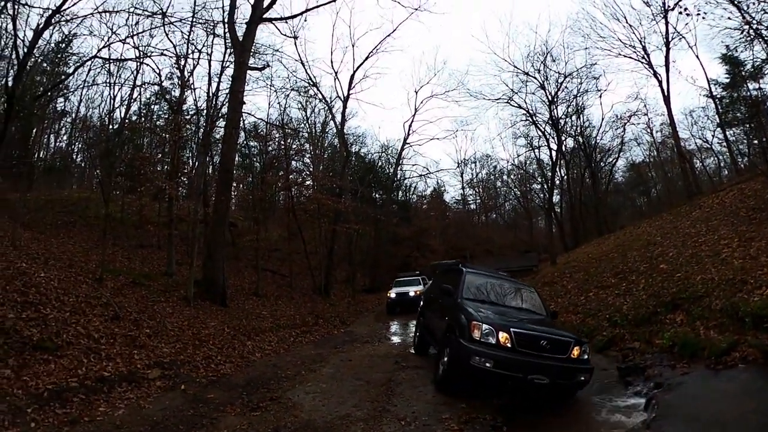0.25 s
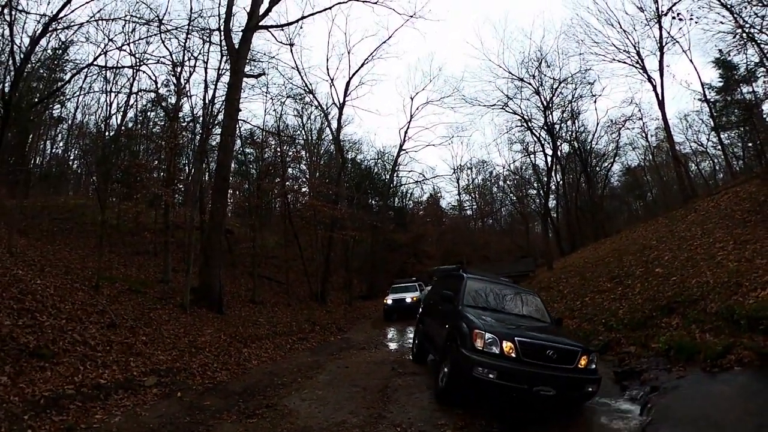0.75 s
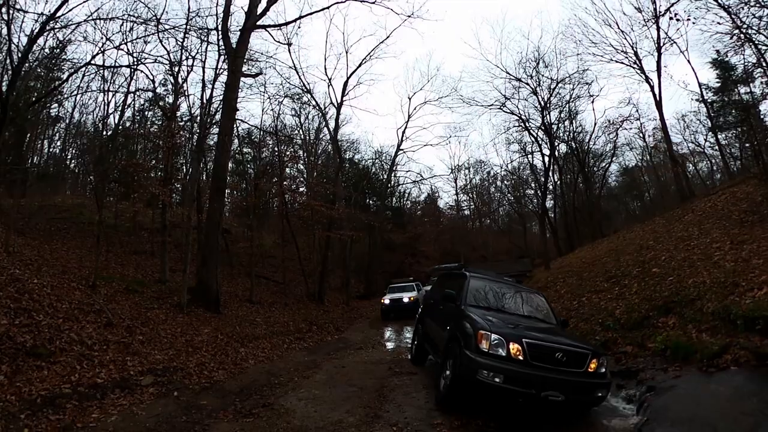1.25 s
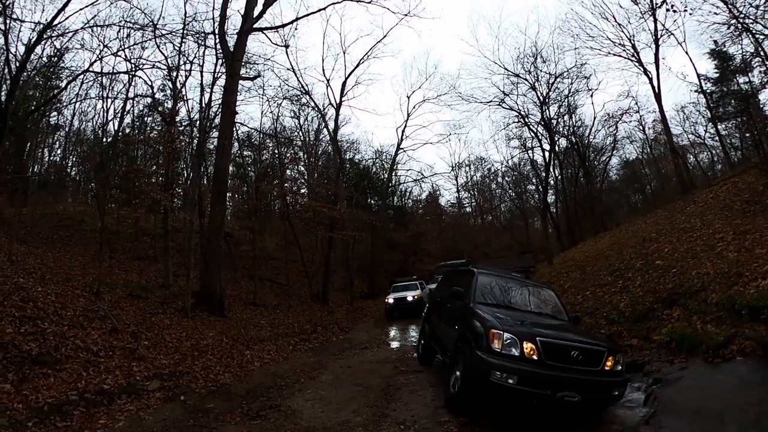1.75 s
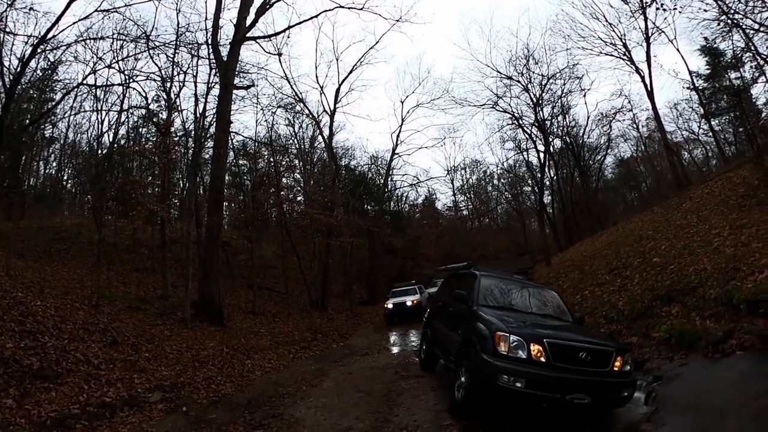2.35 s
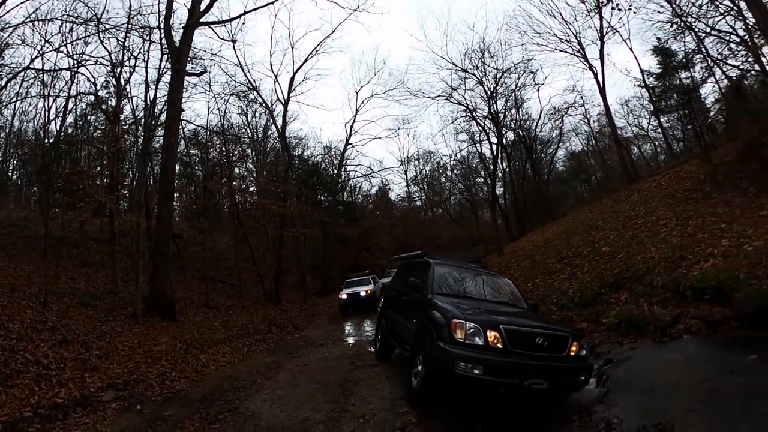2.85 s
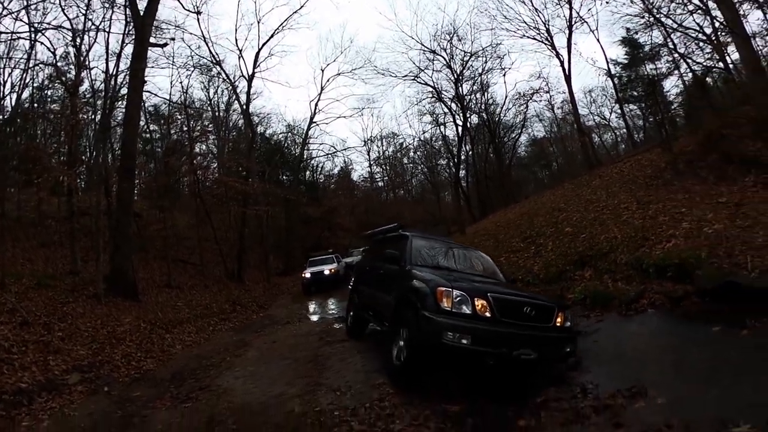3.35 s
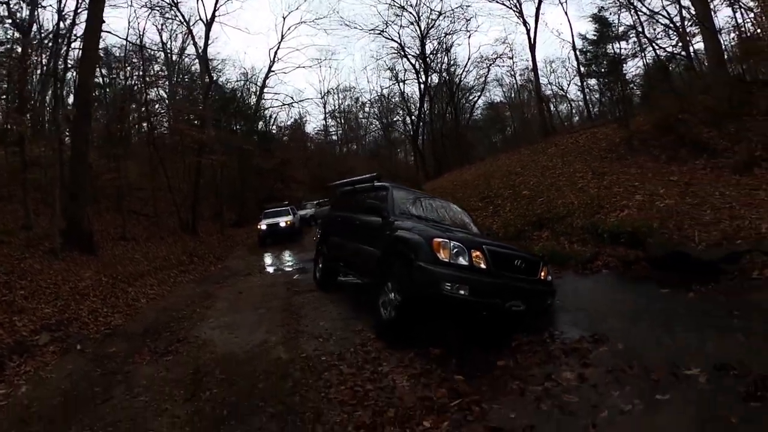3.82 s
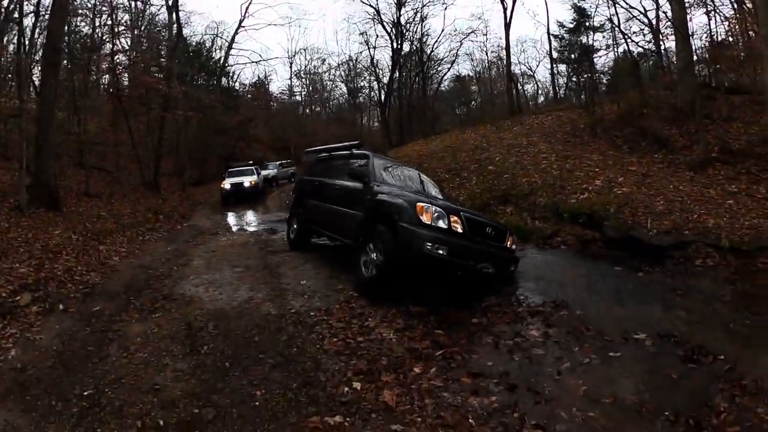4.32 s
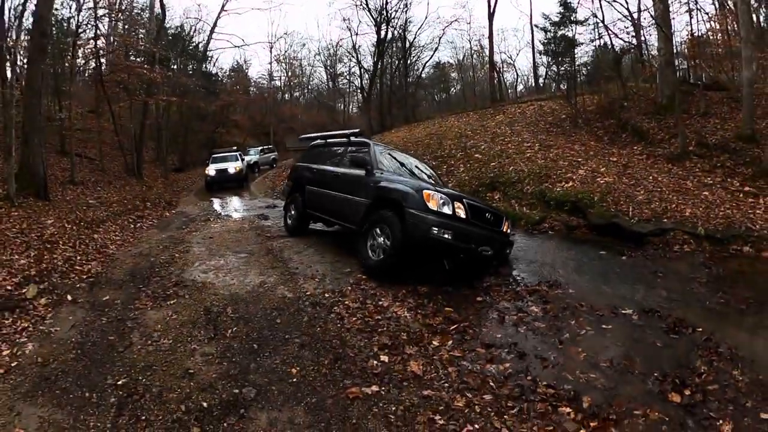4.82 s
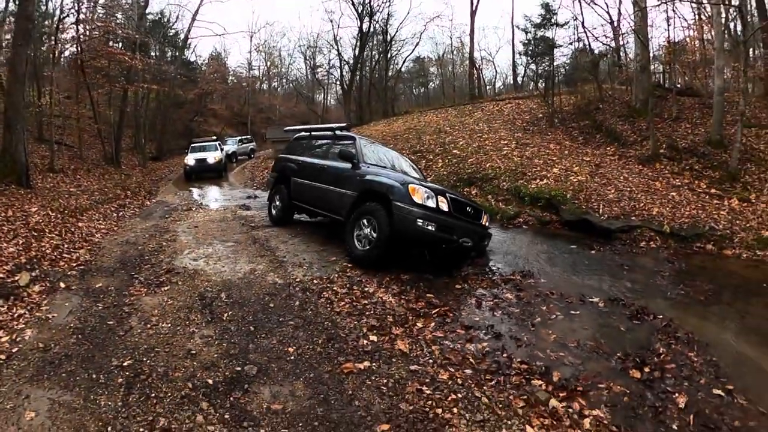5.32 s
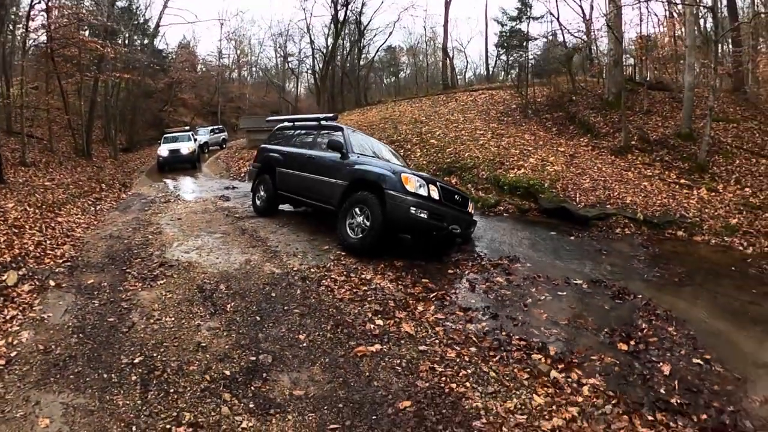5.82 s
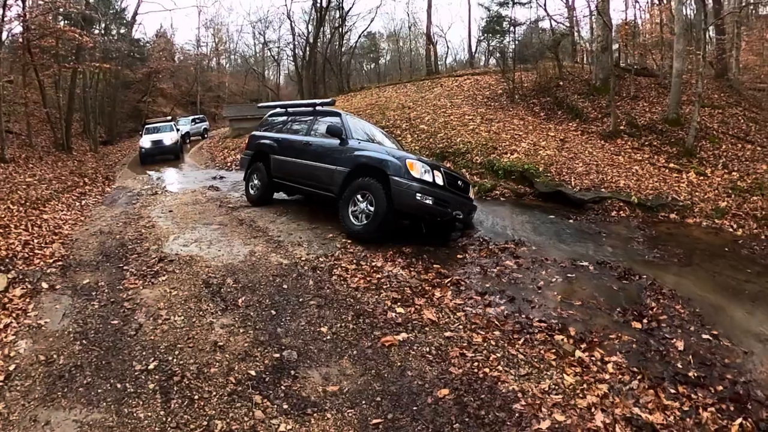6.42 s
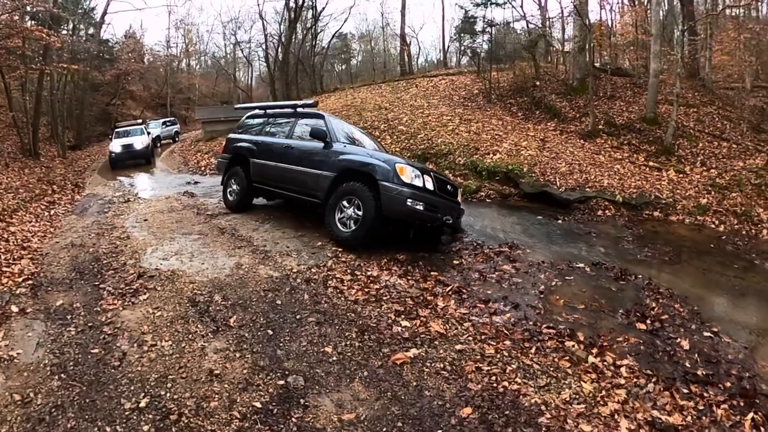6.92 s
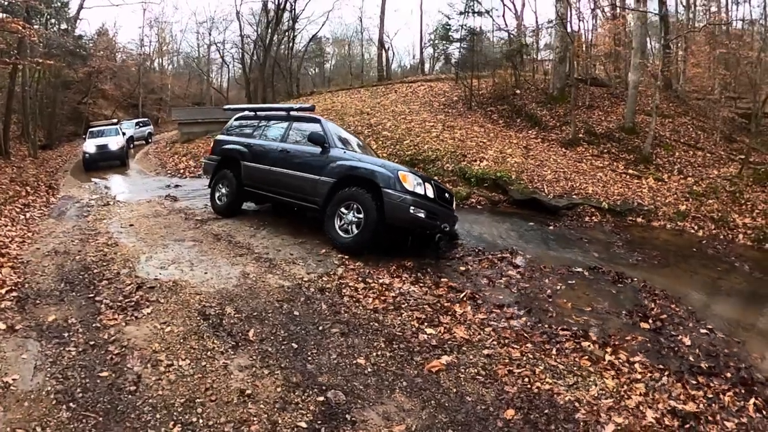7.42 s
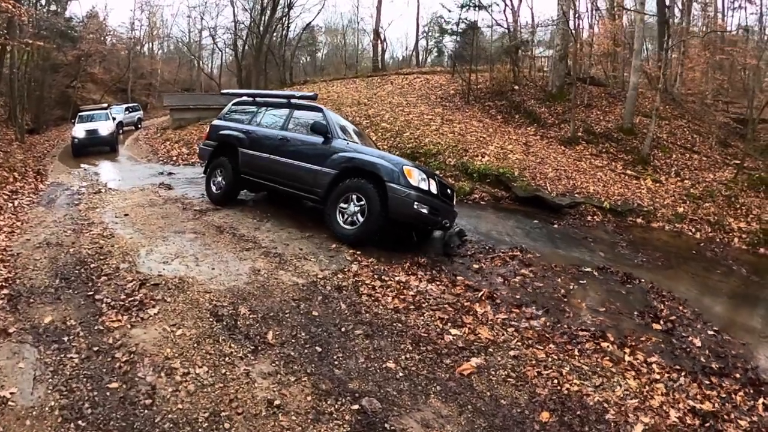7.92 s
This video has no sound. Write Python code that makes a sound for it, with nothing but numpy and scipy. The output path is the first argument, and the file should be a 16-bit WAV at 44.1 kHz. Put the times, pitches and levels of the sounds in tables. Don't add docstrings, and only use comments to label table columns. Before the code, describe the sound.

Outdoors at a forest creek, heard from the bank: tyres push steadily through water with gurgles and fine spray while stones knock. A deep eight-cylinder exhaust rises, a hard crack and gravel crunch follow, and the wash stops. The engine then revs long and loud with a rushing fan, drops to a low hum, and revs again over skidding gravel. Another engine idles faintly behind.

```python
import sys
import numpy as np
from scipy import signal
from scipy.fft import rfft, irfft, next_fast_len
from scipy.io import wavfile
from scipy.ndimage import uniform_filter1d

SR = 44100
rng = np.random.default_rng(int(sys.argv[2]) if len(sys.argv) > 2 else 0)


def rack_gain(trim_db):
    fader = np.asarray(trim_db, float)
    return 10 ** (fader / 20)


def waveform_to_disk(signal):
    frames = np.transpose(np.atleast_2d(signal))
    scaled = np.clip(frames, -1, 1) * 32767
    samples = np.round(scaled).astype(np.int16)
    wavfile.write(sys.argv[1], SR, samples)


N = 360297


def rms_one(x):
    return x / np.sqrt(np.mean(x ** 2) + 1e-20)


def in_time(rows):
    s, *columns = np.transpose(rows)
    return [np.interp(np.arange(N) / SR, s, c) for c in columns]


def sounding(rows, fade_s):
    start, end = rows[0][0], rows[-1][0]
    gate = np.interp(np.arange(N) / SR, [start - fade_s, start, end, end + fade_s], [0, 1, 1, 0])
    return gate * rack_gain(np.array(in_time(rows)))


def swells(rows):
    out = np.zeros((2, N + SR))
    for s, swell_s, fade_s, *levels_db in rows:
        t = np.arange(-int(3 * swell_s * SR), int(3 * fade_s * SR)) / SR
        i = int((s + t[0]) * SR)
        shape_db = 20 * np.where(t < 0, t / swell_s, -t / fade_s)
        out[:, i:i + len(t)] += rack_gain(np.array(levels_db)[:, None] + shape_db)
    return out[:, :N]


def drift(rate):
    r = np.exp(-80 * np.pi * rate / SR)
    slow = signal.lfilter([1], [1, -2 * r, r * r], rng.standard_normal(N // 40 + 2002))[2000:]
    return np.interp(np.arange(N) / 40, np.arange(len(slow)), rms_one(slow))


def grains(per_s, spread_db):
    out = np.zeros(N)
    hit = np.flatnonzero(rng.random(N) < per_s / SR)
    size, sign = rng.random((2, N))[:, hit]
    out[hit] = rack_gain(spread_db * np.minimum(-np.log(size + 1e-9), 3)) * np.sign(sign - 0.5)
    return rms_one(out)


def resonate(x, hz, width_hz):
    r = np.exp(-np.pi * width_hz / SR)
    poles = [1, -2 * r * np.cos(2 * np.pi * hz / SR), r * r]
    return signal.lfilter(np.array([1, 0, -1]) * (1 - r * r) / 2, poles, x)


def twice(x, hz, width_hz):
    return resonate(resonate(x, hz, width_hz), hz, width_hz)


def rung(hz, t60, rise=0.):
    t = np.arange(int(np.clip(t60, 0.002, 0.2) * SR)) / SR
    onset = np.sin(np.pi / 2 * np.minimum(t * hz / 1.22, 1)) ** 2
    return onset * rack_gain(-60 * t / t60) * np.sin(2 * np.pi * hz * t * (1 + rise * t / t60))


def add(out, s, sound):
    i = int(s * SR)
    out[i:i + len(sound)] += sound[:N - i]


def band_pass(x, order, low_hz, high_hz):
    return signal.sosfilt(signal.butter(order, [low_hz, high_hz], "band", fs=SR, output="sos"), x)


def coloured(source, colour):
    hz, level_db = np.transpose(colour)
    size = next_fast_len(N)
    octaves = np.log2(np.maximum(np.arange(size // 2 + 1) * SR / size, 1))
    outside = np.maximum(np.log2(hz[0]) - octaves, 0) + np.maximum(octaves - np.log2(hz[-1]), 0)
    gain_db = np.interp(octaves, np.log2(hz), level_db) - 60 * outside
    return rms_one(irfft(rfft(source, size) * rack_gain(gain_db), size)[:N])


def split(x, edges_hz):
    size = next_fast_len(N)
    hz = np.arange(size // 2 + 1) * SR / size
    below = [0] + [1 / (1 + (hz / edge) ** 16) for edge in edges_hz] + [1]
    return [rms_one(irfft(rfft(x, size) * (b - a), size)[:N]) for a, b in zip(below, below[1:])]


def turbulence(patchy_db, shared):
    out, together, white = 0, drift(26), rng.standard_normal((2, N))
    edges = 28 * 2 ** (np.arange(20) / 2)
    for k, (low, high) in enumerate(zip(edges, edges[1:])):
        flicker_db = patchy_db * (shared * together + 0.93 * drift(13.0))
        out = out + rack_gain(flicker_db) * band_pass(white[k % 2], 2, low, high)
    return rms_one(out)


def bubbles(low_hz, high_hz, per_s, sharpness, count):
    pitches = np.geomspace(low_hz, high_hz, count)
    born, dealt = grains(per_s, spread_db=4.0), rng.integers(0, count, N)
    rings = (twice(born * (dealt == k) + 1e-18, hz, hz / sharpness) for k, hz in enumerate(pitches))
    return rms_one(sum(rings))


# time in seconds, four-stroke cycle rate in Hz.
CYCLE_SPEED = [(2.68, 5.5), (2.88, 7.75), (3.03, 8.7), (3.44, 8.8), (3.83, 7.4), (4.09, 14.0), (4.27, 15.2),
               (4.6, 12.3), (4.81, 16.0), (5.7, 17.4), (6.11, 17.4), (6.3, 12.7), (6.55, 9.2), (6.97, 6.5),
               (7.22, 7.1), (7.42, 12.7), (7.76, 13.7), (8.17, 10.3)]


def speed():
    flywheel_s = 0.1
    return uniform_filter1d(in_time(CYCLE_SPEED)[0], size=int(flywheel_s * SR))


# time in seconds, level in dB.
THROTTLE_LOAD = [(2.62, -37), (2.76, -21.5), (2.92, -18), (3.74, -25.5), (3.92, -19.5), (4.25, -21),
                 (4.52, -24), (4.85, -19), (5.44, -19.5), (5.56, -24), (6.02, -30), (6.16, -20.5),
                 (6.4, -32), (6.9, -40), (7.19, -31), (7.3, -22.5), (7.65, -25), (8.17, -25.5)]
# order, level in dB at mean load, share of the load's swing.
STRONG_ORDERS = [(3, -29, 0.1), (5, -26, 0.16), (8, -24, 0.82), (16, -30.5, 1.24)]
# order, level in dB against the firing order.
WEAK_ORDERS = [(4, -21), (6, -18), (10, -21), (13, -22.5)]
# frequency in Hz, gain in dB.
PIPE_RESPONSE = [(22, -21), (40, -14), (52, -4), (68, 0.5), (95, -6.5), (132, -2.5), (165, -6.5),
                 (280, -24.5)]


def exhaust():
    mean_load_db, uneven_db, rough_db, idle_db = -24, 1.5, 3.5, -1.5
    silencer_db, tailpipe_db = -6, 4.5
    cycle_hz, (load_db,) = speed(), in_time(THROTTLE_LOAD)
    pipe_hz, pipe_db = np.transpose(PIPE_RESPONSE)
    phase = 2 * np.pi * np.cumsum(cycle_hz * (1 + 0.004 * drift(12))) / SR
    levels = {}
    for k, db, share in STRONG_ORDERS:
        through_pipe_db = np.interp(np.log(k * cycle_hz), np.log(pipe_hz), pipe_db)
        levels[k] = db + share * (load_db - mean_load_db) + through_pipe_db
    double_db = [0, silencer_db, silencer_db, tailpipe_db]
    levels[16] = levels[16] + np.interp(16 * cycle_hz, [122, 142, 205, 235], double_db)
    for k, db in WEAK_ORDERS:
        levels[k] = levels[8] + db
    out = np.zeros(N)
    for k, db in levels.items():
        wander_db = uneven_db * drift(5.7)
        if k not in (3, 5, 8):
            wander_db = wander_db + rough_db * drift(9.5)
        out += np.sqrt(2) * rack_gain(db + wander_db) * np.sin(k * phase + k * k)
    idle_gain = rack_gain(np.interp(np.arange(N) / SR, [2.55, 2.72], [idle_db, 0]))
    return idle_gain * out, phase


# time in seconds, level in dB.
BAY_FACING = [(3.62, -3), (3.8, -3.5), (3.97, 0.5), (4.3, 0), (4.55, 0.75), (4.72, 1), (4.95, 0.9),
              (5.3, 2), (6.0, 2.5), (6.4, 0), (7.3, -2), (8.17, -1.5)]
# level in dB at full speed, dB per doubling of speed, share of the facing.
BAY_LAYERS = [(-34, 0.5, 2.55), (-43, 8, 0.64), (-62.5, 10, 0.46), (-75, 19, 1.6)]
# frequency in Hz, level in dB per Hz.
ROAR_COLOUR = [(30, 6.5), (120, 8.5), (220, 1.5), (320, -8), (470, 1), (535, -4), (600, -4), (690, -8.5),
               (870, -7.5), (980, -10.5), (1050, -26.5)]
# frequency in Hz, level in dB per Hz.
FAN_COLOUR = [(1050, 3), (1460, 1), (2150, -3), (2630, -4), (2950, -5.5), (3050, -6.5), (4140, -12),
              (5000, -16.5), (6140, -16.5), (9270, -24.5), (10800, -38.5), (12300, -42), (13200, -42.5),
              (15500, -54)]
# frequency in Hz, width in Hz, level in dB against the roar.
INTAKE_PIPE = [(355.5, 3.8, -23), (537, 82, -13), (2550, 410, -26.5), (1500, 200, -30.5)]
# time in seconds, blade rate in Hz, level in dB.
COASTING_FAN = [
    (5.9, 141.4, -51),
    (6.15, 141.4, -32),
    (6.5, 129.7, -34.5),
    (6.9, 119.5, -42),
    (7.15, 115.2, -35),
]


def engine_bay(rush, phase):
    full_speed_hz = 17
    pedal_lead_s = 0.075
    ahead = np.arange(N) + pedal_lead_s * SR
    revs = np.interp(ahead, np.arange(N), speed()) / full_speed_hz
    (facing,) = sounding(BAY_FACING, fade_s=0.077)
    gains = [rack_gain(db + per_octave_db * np.log2(revs)) * facing ** share
             for db, per_octave_db, share in BAY_LAYERS]
    rush = rush * (1 + 0.035 * np.sin(8 * phase))
    drips = bubbles(1009, 7720, 600, sharpness=24.0, count=9)
    fan = coloured(rush + 0.15 * drips, FAN_COLOUR)
    pipe = sum(rack_gain(db) * rms_one(twice(rush, hz, width_hz)) for hz, width_hz, db in INTAKE_PIPE)
    roar = coloured(rush, ROAR_COLOUR) + pipe * revs ** 3.8
    layers = [roar] + split(fan, [6000, 10500])
    blade_hz, blade_db = in_time(COASTING_FAN)
    turn = 2 * np.pi * np.cumsum(blade_hz) / SR
    blades = rack_gain(blade_db + 1.7 * drift(2.4)) * (np.sin(turn) + rack_gain(-15) * np.sin(2 * turn))
    return np.sum(np.array(gains) * layers, axis=0) + blades


# time in seconds, churn in dB.
TYRE_CHURN = [(0.0, -1), (.55, 2.5), (.85, 2), (1.2, 3.5), (1.6, 2.5), (2.0, -0.3), (2.2, 2), (2.45, 1.6),
              (2.75, 3.5), (3.1, 3), (3.45, 2.5), (3.59, -3.5), (3.7, -19)]
# frequency in Hz, level in dB per Hz.
WASH_COLOUR = [(30, -23), (85, -7), (110, -6.5), (225, 1), (389, -8), (455, -16.5), (530, -15.5),
               (673, -10), (800, -11), (1000, -27)]
# frequency in Hz, level in dB per Hz.
SPRAY_COLOUR = [(1000, -1), (1630, 0.5), (2390, -1.5), (2950, -7), (3420, -7.5), (5060, -17), (5900, -16),
                (6000, -12.5), (7950, -13.5), (8050, -18.5), (8800, -22.5), (9200, -20), (11000, -33.5),
                (15400, -43)]


def wash(rush):
    wash_db, wash_follows, approach_db_per_s, spray_db = -36.5, 0.2, 0.2, -50
    gurgles = bubbles(159.8, 923, 250, sharpness=5.0, count=10)
    low = coloured(rush + 0.19 * gurgles, WASH_COLOUR)
    fizz = bubbles(983, 9000, 1500, sharpness=6.6, count=12)
    spray = coloured(rush + 0.29 * fizz, SPRAY_COLOUR)
    (churn,) = sounding(TYRE_CHURN, fade_s=0.2)
    low_gain = rack_gain(wash_db + approach_db_per_s * np.arange(N) / SR) * churn ** wash_follows
    waves = rack_gain(0.7 * drift(4))
    return rack_gain(0.97) * low_gain * low + rack_gain(spray_db) * churn * spray * waves


# time in seconds, peak in dB, ring in Hz, ring t60 in seconds.
STONE_KNOCKS = [(0.047, -28, 774, 0.02), (0.233, -34, 775, 0.028), (0.256, -32.5, 600, 0.031),
                (1.008, -28, 620, 0.024), (1.047, -30, 667, 0.07), (1.072, -19.5, 694, 0.027),
                (1.128, -15.5, 744, 0.011), (1.256, -30, 660, 0.03), (2.033, -39, 610, 0.057),
                (3.494, -25, 636, .02), (3.503, -24, 720, 0.034), (3.55, -20, 524, 0.027),
                (3.566, -32, 790, 0.016), (3.525, -32, 710, 0.016), (3.911, -28, 800, 0.013),
                (3.595, -18, 483, 0.035), (3.599, -31, 790, 0.024), (3.613, -18, 650, 0.022),
                (3.647, -28, 604, 0.023), (3.826, -27, 826, 0.019), (3.96, -36, 853, 0.014),
                (4.022, -30, 743, 0.016), (7.331, -38, 670, 0.048), (7.378, -34, 503, 0.023),
                (7.826, -25, 990, .015), (7.841, -23, 514, .03), (7.847, -22, 1010, 0.027),
                (7.883, -20, 990, 0.022), (7.907, -26, 596, 0.032), (3.459, -27, 570, 0.019),
                (4.297, -27, 510, 0.031), (4.524, -29.5, 560, 0.046), (4.703, -29, 530, 0.038),
                (4.945, -26, 510, 0.036), (5.471, -25, 528, 0.028), (5.847, -24, 550, 0.041),
                (6.493, -34, 870, 0.052), (6.514, -31, 860, 0.029), (7.049, -28, 890, 0.016),
                (7.072, -26, 885, 0.011)]
# time in seconds, peak in dB, ring in Hz, ring t60 in seconds.
STONE_CRACKS = [(.725, -32, 2220, 0.016), (.726, -28, 1290, 0.011), (3.2, -31, 1250, .012),
                (3.4174, -10, 1520, 0.014), (3.419, -36.5, 2800, 0.0086), (3.418, -13, 640, 0.012),
                (3.418, -6, 361, 0.013), (3.4192, -20, 910, 0.039), (3.474, -26, 1190, 0.035),
                (3.567, -31.5, 1390, 0.016), (3.596, -35, 1480, 0.028), (3.732, -41, 1310, 0.043),
                (3.765, -33, 1300, 0.016), (3.804, -42, 1600, 0.014), (4.041, -34, 1170, .015),
                (4.065, -39, 1500, 0.036), (7.024, -35, 1270, .015), (7.051, -33, 1500, .01),
                (7.07, -34, 1500, .01), (7.706, -30, 1510, 0.027), (7.761, -35, 1470, 0.017),
                (7.795, -29, 1600, .015), (7.86, -22, 1500, 0.023), (3.818, -31, 1520, 0.022),
                (3.874, -28, 1380, 0.018), (3.91, -11.5, 1300, 0.0079), (7.196, -22, 1100, 0.01),
                (7.195, -23, 2030, 0.005), (7.678, -24, 1465, 0.025)]
# time in seconds, peak in dB, ring in Hz, ring t60 in seconds.
WHEEL_THUMPS = [(0.083, -14.5, 150, 0.057), (0.09, -28, 622, 0.05), (0.1, -24, 337, 0.04),
                (.758, -24, 220, 0.048), (3.2, -28, 114, 0.33), (0.725, -27, 686, .01),
                (0.128, -29, 200, 0.055), (3.43, -12, 38, 0.15), (3.47, -12, 97, 0.19),
                (7.0, -30, 113.5, 0.26), (7.03, -23.5, 86, 0.32), (7.122, -29, 132, 0.18),
                (7.201, -25, 207, 0.093), (7.3, -27, 139, 0.18)]
# frequency in Hz, level in dB, t60 in seconds.
STONE_BED = [(150, -18, 0.03), (361, -8.5, 0.019), (910, -26.5, 0.14), (2330, -29, 0.0079)]


def knocks():
    out, hits = np.zeros(N), STONE_KNOCKS + STONE_CRACKS + WHEEL_THUMPS
    shakes_db = rng.normal(0, 1.9, (len(hits), len(STONE_BED)))
    for (s, peak_db, hz, t60), shake_db in zip(hits, shakes_db):
        add(out, s, rack_gain(peak_db + 4.0) * rung(hz, t60))
        if hz > 1000:
            add(out, s, rack_gain(peak_db - 5.5) * rung(hz * 0.63, 0.008))
            add(out, s, rack_gain(peak_db - 17) * rung(hz * 1.7, 0.008))
        for (bed_hz, bed_db, bed_t60), own_db in zip(STONE_BED, shake_db):
            add(out, s, rack_gain(peak_db + bed_db + own_db) * rung(bed_hz, bed_t60))
    return out


# frequency in Hz, width in Hz, dB under the wheel, dB skidding loose.
GRAVEL = [(114.3, 19, 26, -34), (200, 66, 18, -2.5), (528, 180, 7, 1.5), (640, 194, 10.5, -8),
          (1006, 290, -35, -1), (1520, 250, -9.5, -4.5)]
# peak time in seconds, swell in seconds, fade in seconds, low grind in dB, chips in dB.
CRUSH = [(3.478, 0.046, 0.032, -18.5, -48), (3.508, 0.043, .05, -18.5, -58), (3.56, 0.04, 0.055, -21, -57),
         (3.602, 0.025, 0.1, -24, -51), (3.62, 0.034, 0.039, -37, -42), (6.94, 0.04, 0.15, -32.5, -45),
         (7.054, 0.021, 0.11, -33, -43.5), (7.25, 0.032, 0.19, -38, -64.5), (7.4, 0.049, 0.031, -33, -40),
         (7.5, 0.035, .04, -45, -40.5)]
# peak time in seconds, swell in seconds, fade in seconds, low grind in dB, chips in dB.
SKID = [(3.814, 0.037, 0.14, -33.5, -38.5), (3.912, 0.01, 0.016, -22.5, -42), (3.99, 0.025, 0.12, -45, -48),
        (4.08, 0.25, 0.02, -37, -51), (4.78, 0.17, 0.35, -41.5, -42.5), (6.5, 0.085, 0.14, -40.5, -56),
        (7.678, 0.011, 0.14, -33, -38), (7.765, 0.025, 0.099, -43, -44), (7.8, .04, .06, -47, -44),
        (7.822, 0.032, 0.094, -43, -44), (7.853, 0.035, 0.1, -26.5, -35), (7.87, 0.056, 0.094, -35, -36),
        (7.885, 0.081, 0.014, -25, -38.5), (7.91, .02, 0.037, -53, -42)]


def grind():
    clicks = np.array([grains(800, spread_db=3.5), grains(2500, spread_db=2.5)])
    rings = np.array([(-1) ** k * twice(clicks, hz, 1.64 * width_hz)
                      for k, (hz, width_hz, *_) in enumerate(GRAVEL)])
    loaded, loose = np.sum(rack_gain(np.array(GRAVEL)[:, 2:, None]) * rings, axis=0)
    splinters = bubbles(1700, 8200, 2500, sharpness=2.0, count=7) + 2.0 * grains(4600, spread_db=-19.0)
    grit = rms_one(band_pass(splinters, 2, 5000, 12500))
    chips = band_pass(splinters, 2, 1500, 4500)
    chips = rms_one(signal.sosfilt(signal.butter(2, 8000, fs=SR, output="sos"), chips))
    crush_gain, crush_chips = swells(CRUSH)
    skid_gain, skid_chips = swells(SKID)
    low = rack_gain(-3.0) * crush_gain * rms_one(loaded) + rack_gain(-4.5) * skid_gain * rms_one(loose)
    thrown = crush_chips + skid_chips
    grit_gain = rack_gain(-17.5) * np.sqrt(thrown / rack_gain(-30))
    return low + rack_gain(-8.0) * thrown * (chips + grit_gain * grit)


# time in seconds, peak in dB, ring in Hz.
WATER_DROPS = [(0.3082, -31, 6540), (0.575, -23.5, 3670), (1.0081, -26, 6640), (2.187, -33, 7500),
               (2.2538, -28, 3900), (2.7072, -35, 3820), (3.61, -22.5, 4600), (3.808, -29, 5300),
               (3.8761, -31, 3570), (3.9105, -31, 3580), (3.995, -30, 5900), (4.315, -30, 6100),
               (4.522, -29, 3860), (4.5979, -32, 4100), (4.775, -28, 4000), (5.5222, -24, 3770),
               (5.5653, -28, 3350), (6.2696, -39, 3780), (7.1172, -35, 4210), (7.243, -36, 3800),
               (7.4944, -42, 4200), (7.6791, -39, 3480), (7.7597, -48, 3580), (7.7942, -42, 3570),
               (7.8545, -48, 3770)]


def drops():
    out, n = np.zeros(N), np.arange(400)
    tick = np.minimum(n / 50, 1) * np.exp(-n / 150)
    for (s, peak_db, hz), hiss in zip(WATER_DROPS, rng.standard_normal((len(WATER_DROPS), 400))):
        add(out, s, rack_gain(peak_db - 16.5) * rung(hz, 0.022, rise=0.042))
        add(out, s, rack_gain(peak_db - 14) * hiss * tick)
    return band_pass(out, 3, 2000, 8500)


# time in seconds, level in dB, whistle in Hz.
TREAD_SQUEAKS = [(3.806, -36, 5210), (4.068, -32, 3560), (7.758, -30.5, 3490), (7.852, -30, 4600),
                 (7.888, -29, 5200), (7.894, -32, 5270), (7.698, -46, 5800), (7.728, -41, 5900),
                 (7.8, -37, 3100)]


def squeaks():
    out = np.zeros(N)
    for (s, level_db, hz), noise in zip(TREAD_SQUEAKS, rng.standard_normal((len(TREAD_SQUEAKS), 2000))):
        whistle = rung(hz, 0.028, rise=0.08)
        rough = rms_one(uniform_filter1d(uniform_filter1d(noise, size=24), size=17))
        whistle = whistle * (0.6 + 0.6 * rough[:len(whistle)])
        add(out, s, rack_gain(level_db) * whistle * np.minimum(np.arange(len(whistle)) / 90, 1))
    return out


def banks(x):
    dull = signal.lfilter([0.2], [1, -0.8], x)
    echoes = [(0.006, -16), (0.019, -26), (0.047, -26)]
    return sum(rack_gain(db) * np.roll(dull, int(lag_s * SR)) for lag_s, db in echoes)


# frequency in Hz, width in Hz, level in dB.
IDLE_BOOM = [(50.7, 11.5, -46), (78.7, 53, -39)]


def idler():
    return sum(rack_gain(db) * rms_one(twice(rng.standard_normal(N), hz, width_hz))
               for hz, width_hz, db in IDLE_BOOM)


# frequency in Hz, level in dB per Hz.
FOREST_COLOUR = [(1000, 3.5), (4000, -12.5), (9000, -18), (15000, -35)]


def forest():
    return rack_gain(-61.5) * coloured(rng.standard_normal(N), FOREST_COLOUR)


def scene():
    pipes, phase = exhaust()
    rush = turbulence(patchy_db=1.5, shared=0.42)
    stones = knocks() + grind() + drops() + squeaks()
    vehicle = pipes + engine_bay(rush, phase) + wash(rush)
    return (vehicle + stones + banks(stones) + idler() + forest())[None]


def roll_off(x):
    return signal.sosfilt(signal.butter(12, 15650, fs=SR, output="sos"), x)


def record(dry):
    thinned = signal.sosfilt(signal.butter(2, 33, "high", fs=SR, output="sos"), dry)
    thinned = signal.sosfilt(signal.butter(6, 15000, fs=SR, output="sos"), thinned)
    return roll_off(thinned)


dry = scene()
out = record(dry)
waveform_to_disk(out)
```